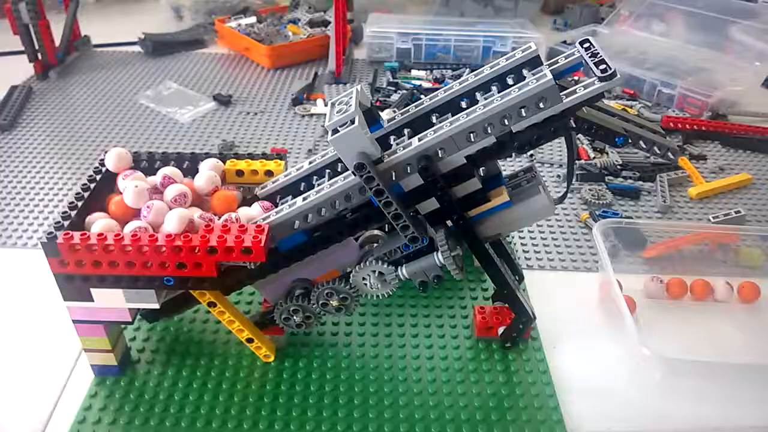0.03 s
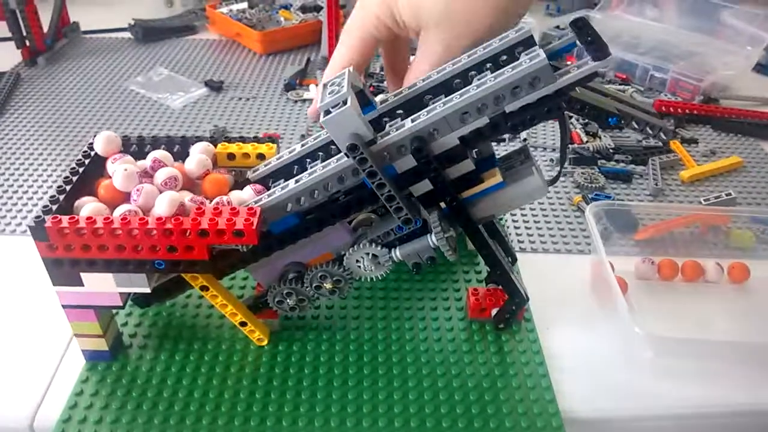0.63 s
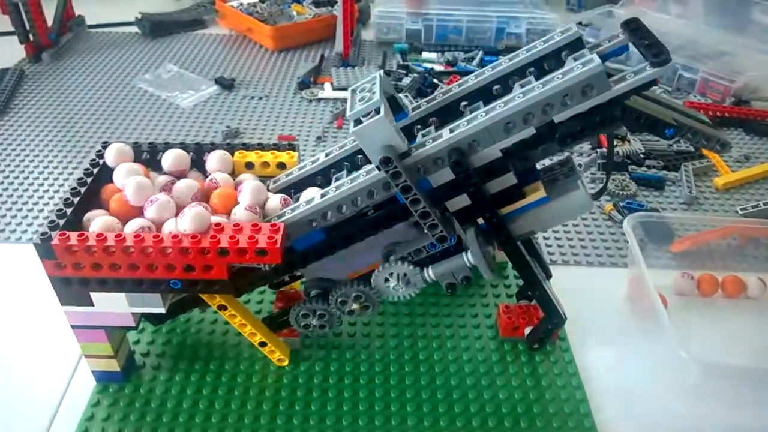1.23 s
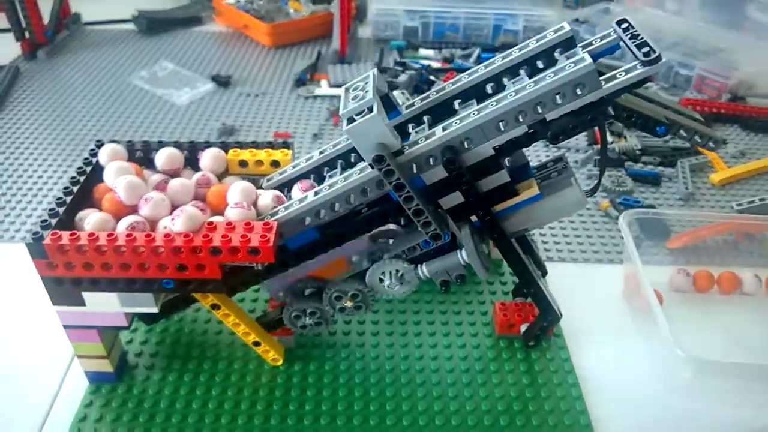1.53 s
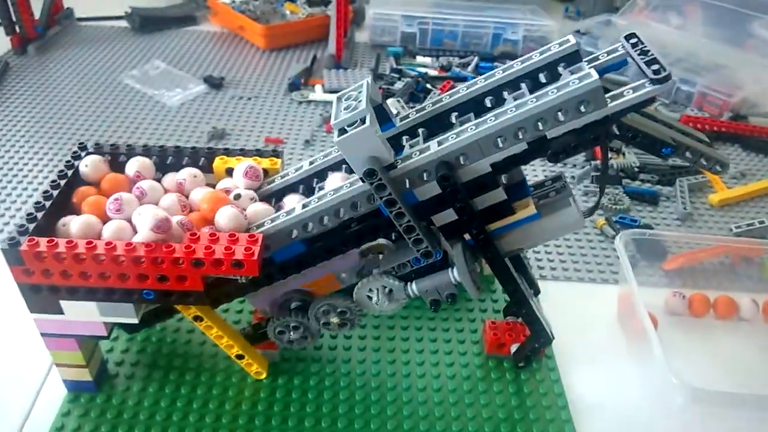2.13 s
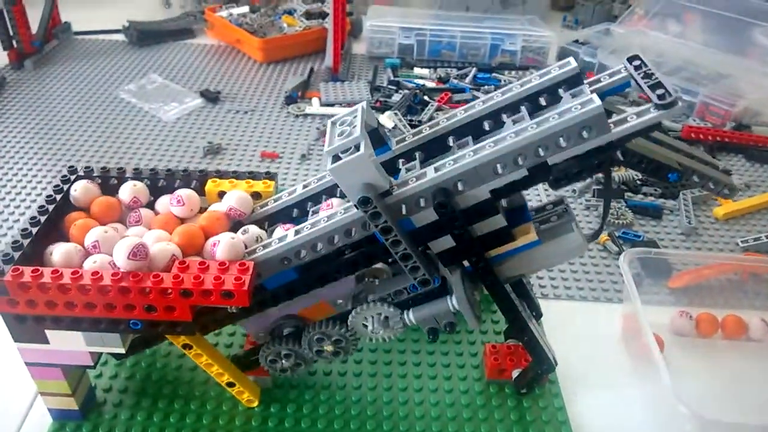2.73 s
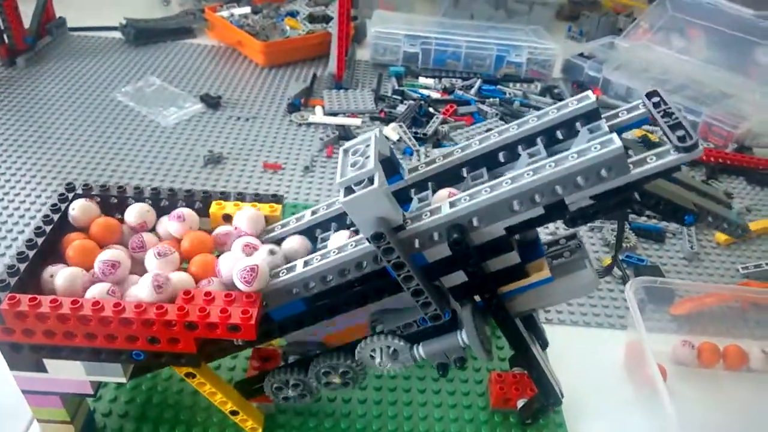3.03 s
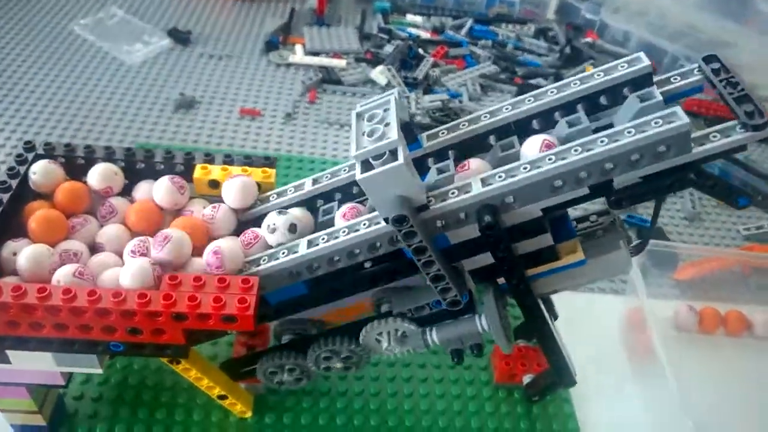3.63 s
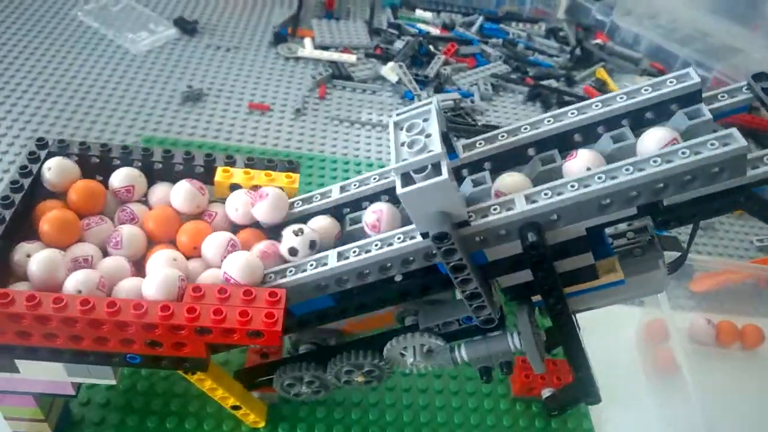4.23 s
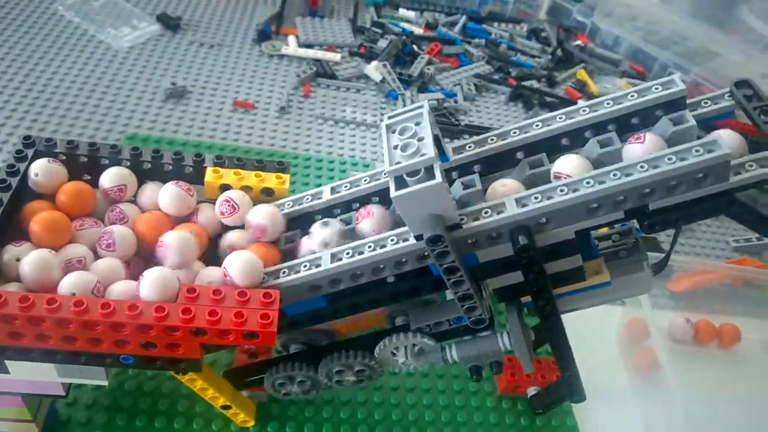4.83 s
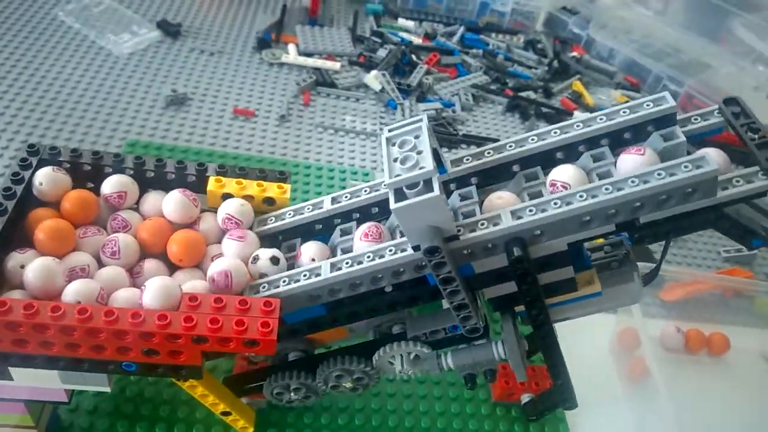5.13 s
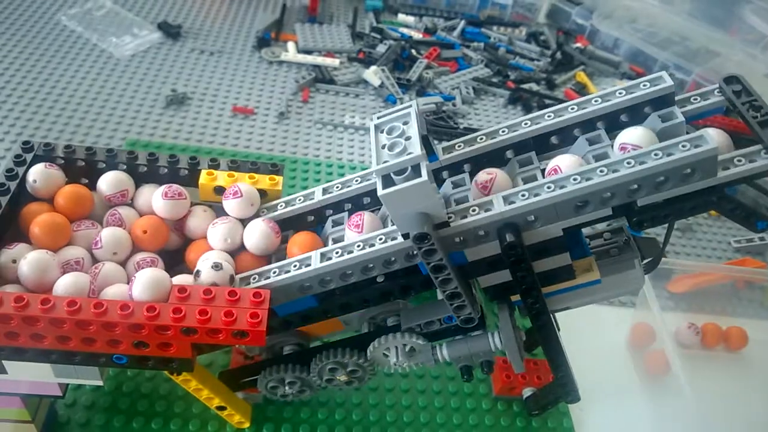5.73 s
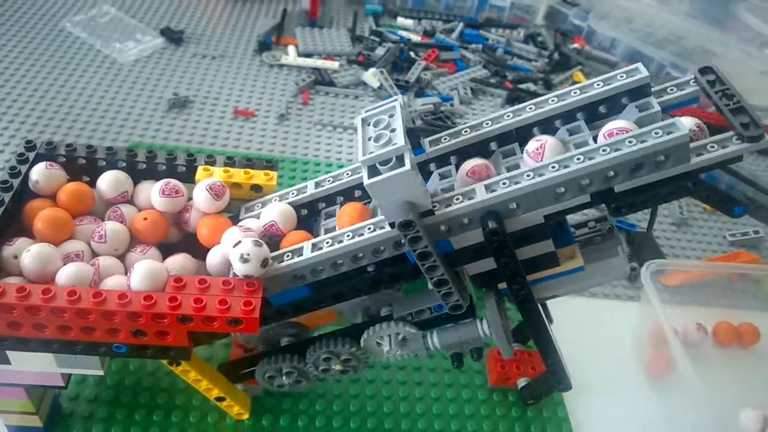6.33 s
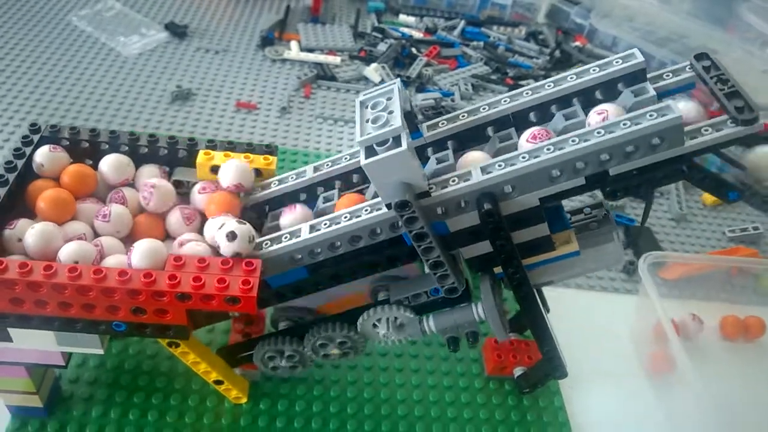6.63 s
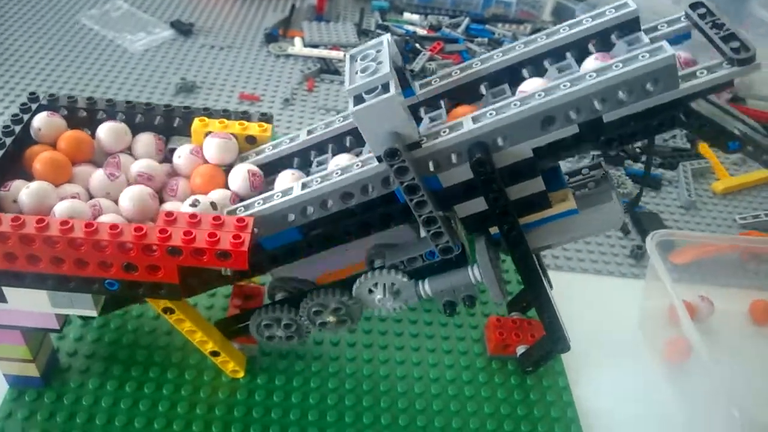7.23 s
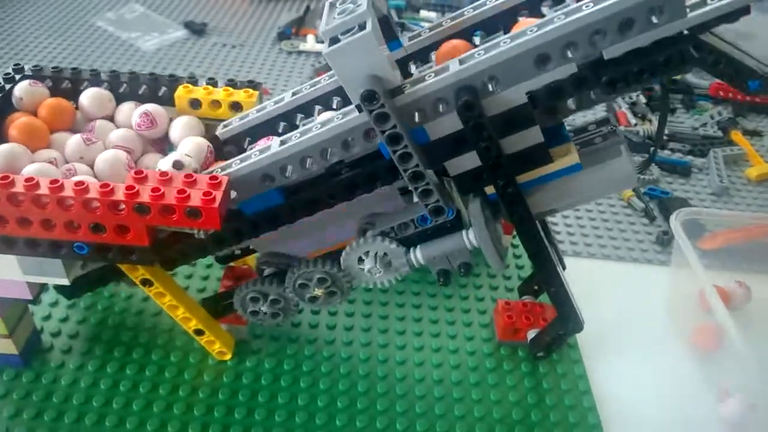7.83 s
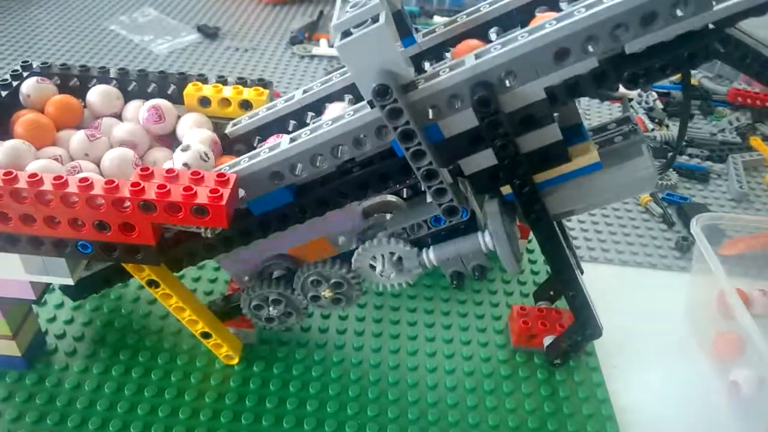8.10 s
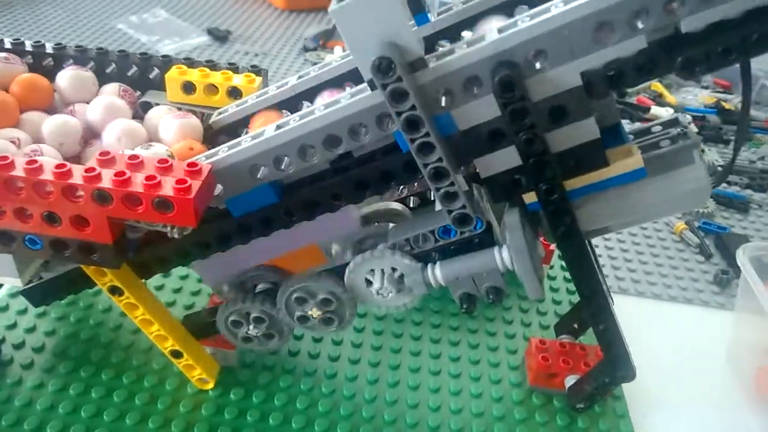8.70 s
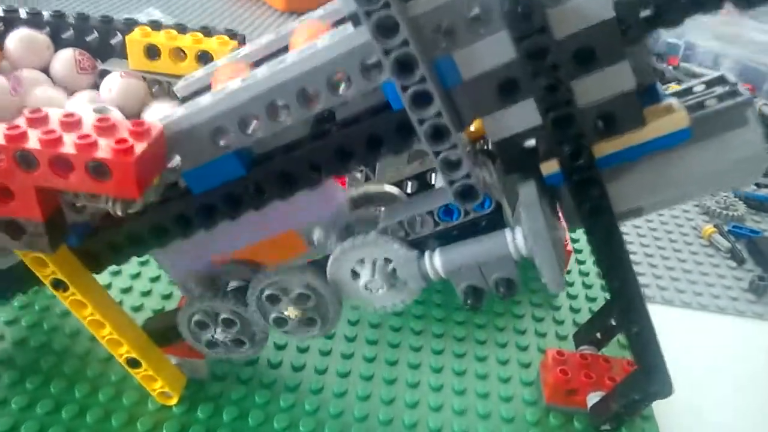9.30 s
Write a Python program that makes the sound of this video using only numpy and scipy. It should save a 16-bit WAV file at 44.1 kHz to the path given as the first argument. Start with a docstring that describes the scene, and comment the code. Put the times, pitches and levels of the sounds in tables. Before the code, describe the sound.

Plastic balls clatter as a toy brick lift whirrs and scrapes in steady strokes, then knock hollowly into a tub.

```python
"""Toy ball lift on a table.

A motorised lift of plastic bricks runs in a quiet room, close to a hand-held camera. Over whirring
gears its steps grind and hiss up and down about every 0.6 s, stirring a hopper of small plastic balls
that click together. Later the balls reach the top and drop into a thin plastic tub;
fingers bump the camera as it moves closer."""
import sys
import numpy as np
from scipy import signal
from scipy.fft import rfft, irfft, next_fast_len
from scipy.io import wavfile
from scipy.ndimage import uniform_filter1d, map_coordinates

SR = 44100
rng = np.random.default_rng(int(sys.argv[2]) if len(sys.argv) > 2 else 0)


def materialize(psi):
    """Save the field psi as 16-bit PCM at rate SR to the path in sys.argv[1].

    A 1-D psi becomes a single channel; in a 2-D psi each row is a channel.
    """
    bounded = np.clip(np.atleast_2d(psi).T, -1, 1)
    quanta = np.round(bounded * 32767).astype(np.int16)
    wavfile.write(sys.argv[1], SR, quanta)


N = 417186
TIME = np.arange(N) / SR
RING = np.arange(SR // 3) / SR  # time axis of one impact, s
IMPULSE = np.where(RING == 0, 1., 0.)
MOTOR_ON_S = 0.87


def undb(db):
    """Decibels to gain."""
    return 10 ** (np.asarray(db) / 20)


def unit(x):
    """Scale to rms 1."""
    return x / np.sqrt(np.mean(x ** 2))


def strike(x):
    """Scale the loudest 5 ms to rms 1."""
    return x / np.sqrt(uniform_filter1d(x ** 2, 220, mode="constant").max())


def since(t_s):
    """Seconds since t_s, 0 before."""
    return np.maximum(TIME - t_s, 0)


def add(out, t_s, x):
    """Mix x into out at t_s."""
    i = int(t_s * SR)
    out[i:i + len(x)] += x[:N - i]


def colour(x, outline, modes=()):
    """Minimum-phase filter: outline (f/Hz, level/dB) plus peaks (f/Hz, width/Hz, gain/dB)."""
    n = 2 * next_fast_len(len(x))
    f = np.maximum(np.arange(n // 2 + 1) * SR / n, 1)
    hz, db = np.transpose(outline)
    db = np.interp(np.log(f), np.log(hz), db)
    for centre_hz, width_hz, gain_db in modes:
        db = db + gain_db / (1 + (2 * (f - centre_hz) / width_hz) ** 2)
    cepstrum = irfft(np.log(undb(db)))
    cepstrum[1:n // 2] *= 2
    cepstrum[n // 2 + 1:] = 0
    return irfft(rfft(x, n) * np.exp(rfft(cepstrum)))[:len(x)]


def fade(t60_s):
    """Exponential decay, -60 dB at t60_s."""
    return np.exp(-np.log(1000) * RING / t60_s)


def burst(t60_s):
    """Dense modes of a small part, as decaying noise."""
    return rng.standard_normal(len(RING)) * fade(t60_s)


def ring(modes, scatter_db, detune):
    """Damped modes (f/Hz, t60/s, level/dB); level and pitch vary with the spot struck."""
    out = 0
    for k, (hz, t60_s, db) in enumerate(modes):
        size, shift = rng.standard_normal(2)
        tone = np.sin(2 * np.pi * hz * (1 + detune * shift) * RING)
        out += (-1) ** k * undb(db + scatter_db * size) * fade(t60_s) * tone
    return out


def walk(rate_hz):
    """Smooth random drift, rms 1."""
    hold = max(int(SR / rate_hz), 2)
    steps = np.repeat(rng.standard_normal(N // hold + 1), hold)
    return unit(uniform_filter1d(steps, hold)[:N])


def wander(x, depth, rate_hz=10):
    """All resonances drift together as the contact point moves."""
    position = np.cumsum(1 + depth * walk(rate_hz))
    return unit(map_coordinates(x, [position], order=3, mode="mirror"))


def contacts(per_s, spread_db, t60_s, parts=10):
    """Tiny random impacts of uneven size on several ringing parts."""
    out = 0
    for _ in range(parts):
        sizes = undb(spread_db * np.minimum(rng.standard_exponential(N), 4))
        hits = (rng.random(N) < per_s / parts / SR) * sizes * rng.choice([-1, 1], N)
        out += signal.oaconvolve(hits, burst(t60_s))[:N]
    return unit(out)


# Wall reflections: f/Hz, level/dB
REVERB_EQ = [(100, 9.5), (300, 4), (900, 4), (2000, 0), (5000, -9), (16000, 3)]


def reverb(x, t60_s, delay_s):
    """Small-room tail after a short gap."""
    tail = burst(t60_s) * np.clip((RING - delay_s) / 0.0055, 0, 1)
    return signal.oaconvolve(x, colour(tail / np.linalg.norm(tail), REVERB_EQ))[:len(x)]


# Room air: f/Hz, level/dB
AIR_EQ = [(25, -8), (50, -3), (170, -7.5), (265, 3), (400, -9.5), (550, -11), (800, -11), (1050, -11),
          (2000, -20), (4000, -22), (7000, -27.5), (11000, -31.5), (16000, -37)]
# Mains and fan hum: f/Hz, drift width/Hz, level/dB
HUM_LINES = [(47.7, 5, -70.5), (100.3, 2.3, -68), (480, 3.8, -76)]


def room_tone(air_db=-65):
    """Faint air noise and wavering hum."""
    out = undb(air_db) * unit(colour(rng.standard_normal(N), AIR_EQ))
    for hz, width_hz, db in HUM_LINES:
        phase = 2 * np.pi * np.cumsum(hz + width_hz / 2 * walk(30)) / SR
        out += undb(db) * unit(np.sin(phase) * undb(2 * walk(10)))
    return out


# Fan swells: t/s, level/dB
FAN_SWELLS = [(.22, -76), (.3, -63), (.39, -77), (.48, -55), (.56, -78), (.67, -72), (.77, -60.5),
              (1.1, -63)]


def fan(hz=288, drift_hz=6):
    """Soft hum that swells and fades, then flutters once the lift runs."""
    tone = np.sin(2 * np.pi * np.cumsum(hz + drift_hz * walk(25)) / SR)
    flutter = 1 + 0.8 * np.minimum(since(MOTOR_ON_S), 1) * walk(14)
    return undb(np.interp(TIME, *np.transpose(FAN_SWELLS))) * unit(tone) * flutter


# Fingers on the camera: t/s, thump/dB, f/Hz, tick/dB
FINGER_BUMPS = [(4.912, -18, 478, -19.5), (8.518, -28.5, 312, -53), (8.669, -21.5, 327, -33),
                (8.706, -29, 326, -47), (8.95, -26, 390, -51), (8.967, -22.5, 350, -37),
                (9.063, -21, 383, -29), (9.089, -18, 386, -36), (9.147, -24.5, 328, -37.5),
                (9.2, -17.5, 360, -30.5), (9.238, -17.5, 365, -28), (9.358, -21.5, 347, -28.5)]


def bumps(rise_s=0.00087, decay_s=0.0022, lead_s=0.02):
    """The case ticks, thumps for a few cycles and shudders."""
    out = np.zeros(N)
    t = RING[RING < 3 * lead_s] - lead_s
    for t_s, db, hz, tick_db in FINGER_BUMPS:
        envelope = 1 / (np.exp(-t / rise_s) + np.exp(t / decay_s))
        thump = envelope / envelope.max() * np.cos(2 * np.pi * hz * t + np.pi / 4)
        tick = colour(burst(0.0059), [(500, -7), (2000, 4.5), (8000, -0.5), (16000, -2.5)])
        shudder = colour(burst(0.071), [(30, -4), (160, 7.5), (400, 3.5), (2000, -82)])
        add(out, t_s - lead_s, undb(db) * thump)
        add(out, t_s - 0.0028, undb(tick_db) * strike(tick))
        add(out, t_s, undb(db - 19) * strike(shudder))
    return out


def jolt(level_db=-42):
    """The frame shakes the table as the motor takes up the load."""
    out = np.zeros(N)
    thud = colour(burst(0.22), [(25, -9), (60, -1), (220, -3), (450, -10), (1500, -15), (8000, -72)])
    add(out, MOTOR_ON_S + 0.0127, undb(level_db) * strike(thud))
    return out


# Axle sizzle: t/s, length/s, level/dB
AXLE_SPELLS = [(4.525, 0.45, -48.5), (8.027, .48, -45.5), (8.63, 0.97, -54)]
# Axle resonances: f/Hz, width/Hz, gain/dB
AXLE_MODES = [(9800, 1600, 16), (14500, 3400, 21)]


def axle(ramp_s=0.032):
    """Flickering friction of a dry axle, ringing in two high bands."""
    friction = rng.standard_normal(N) * undb(4.5 * walk(70))
    sizzle = colour(friction, [(4000, -40), (8000, -10), (12000, -8), (16000, -17)], AXLE_MODES)
    gain = sum(undb(db) * np.clip(np.minimum(TIME - t_s, t_s + length_s - TIME) / ramp_s, 0, 1)
               for t_s, length_s, db in AXLE_SPELLS)
    return gain * unit(sizzle)


# Gear train: f/Hz, level/dB
GEAR_EQ = [(30, -9), (70, 3.5), (140, -11.5), (260, 8), (400, 0.5), (620, -2.5), (950, 3), (1400, 4.5),
           (2500, -5.5), (4400, -13), (8000, -7), (10000, -7.5), (12000, -15), (13500, -27), (16000, -30)]
# Gear resonances: f/Hz, width/Hz, gain/dB
GEAR_PEAKS = [(754, 29, 8.5), (940, 27, 5), (1250, 48, 4), (1550, 60, 8.5), (3440, 450, 5),
              (5170, 370, 12.5), (6630, 2200, 11.5)]


def gears(effort_db, load_share=0.11):
    """Whirr of tooth contacts, louder under load and as the camera closes in."""
    whirr = unit(colour(contacts(per_s=4000, spread_db=3.5, t60_s=0.034), GEAR_EQ, GEAR_PEAKS))
    nearness_db = np.interp(TIME, [3, 6.5, 9], [-52, -50.5, -45])
    load_db = load_share * (effort_db - np.median(effort_db))
    return whirr * undb(nearness_db + load_db + 2.7 * walk(25))


# Pushing step: f/Hz, level/dB
PUSH_EQ = [(1500, -12), (2800, -8.5), (4500, -9.5), (7000, -6), (9000, -10), (12000, -2), (14500, -7.5),
           (16000, -13)]
# Its resonances: f/Hz, width/Hz, gain/dB
PUSH_MODES = [(2900, 190, 11.5), (3670, 200, 14.5)]
# Step sliding back: f/Hz, level/dB
RETURN_EQ = [(700, -16), (1400, -4), (2100, -4), (2800, -3), (4000, -28), (5900, -21), (7400, -4),
             (8300, -13), (9700, -4), (12000, -12), (14300, -9), (16000, -16)]


def step_hiss(push_gain, return_gain):
    """Sliding faces hiss, singing only under load."""
    friction = rng.standard_normal(N) * undb(3.3 * walk(64) + 2.3 * walk(13))
    singing = wander(colour(friction, PUSH_EQ, PUSH_MODES), depth=0.022)
    return push_gain * singing + return_gain * unit(colour(friction, RETURN_EQ))


def clack(centre_hz, t60_s, spread_oct=0.274):
    """One struck brick: six short modes around its pitch."""
    pitches_hz = centre_hz * 2 ** (spread_oct * rng.uniform(-0.988, 1, size=6))
    return strike(ring([(hz, t60_s, 0) for hz in pitches_hz], scatter_db=2.5, detune=0))


def rattle(range_db, count, centre_hz=3100, spread_oct=0.85):
    """Loose bricks and balls clack at random, each at its own pitch."""
    out = np.zeros(N)
    bricks = [clack(centre_hz * 2 ** (spread_oct * rng.uniform(-1, 1)), t60_s=0.035)[:SR // 10]
              for _ in range(40)]
    for when, which, size in rng.random((count, 3)):
        add(out, when * TIME[-1], undb(range_db * size) * bricks[int(which * len(bricks))])
    return unit(out)


# Brick frame: f/Hz, level/dB
FRAME_EQ = [(60, -45), (150, -19), (400, -20.5), (540, -5), (680, -9.5), (1000, -4.5), (1500, 1),
            (2100, -1.5), (2900, -1.5), (4800, -4), (7000, -9.5), (10000, -13.5), (13000, -24.5),
            (16000, -72)]
# Frame resonances: f/Hz, width/Hz, gain/dB
FRAME_PEAKS = [(544, 35, 3.5), (762, 150, 4), (940, 46, 11.5), (1175, 286, 6), (1410, 150, 4),
               (3590, 120, 2.5), (5100, 330, 4)]
# Ball on ball: f/Hz, level/dB
TICK_EQ = [(400, -16), (1500, -3), (3300, 2.5), (5500, -0.5), (9000, -3), (16000, -29)]


def scrape(effort_db):
    """Steps catch and slip, grinding through the frame; jostled balls rattle and tick."""
    judder_db = 2.16 * walk(110) + 2 * walk(28)
    grit = contacts(per_s=1900, spread_db=3, t60_s=0.012)
    grind = wander(colour(grit, FRAME_EQ, FRAME_PEAKS), depth=0.007)
    ticks = unit(colour(contacts(per_s=51, spread_db=4, t60_s=0.0075), TICK_EQ))
    mix = undb(-5.5) * grind + undb(-11) * rattle(range_db=11, count=800) + undb(-16) * ticks
    return mix * undb(effort_db + judder_db)


# Pile giving way: t/s, length/s, level/dB, f/Hz
PILE_SLIPS = [(1.02, 0.047, -36.5, 2940), (1.11, 0.044, -39, 2800), (1.231, 0.03, -37.5, 2800),
              (1.659, 0.046, -41.5, 2400), (1.744, 0.067, -37, 2400), (1.831, 0.019, -35.5, 3400),
              (2.274, .12, -38, 2750), (2.455, 0.046, -32.5, 2800), (2.817, 0.042, -41.5, 3700),
              (2.938, 0.11, -36, 2700), (3.106, 0.035, -36.5, 3700), (3.539, 0.066, -32.5, 2810),
              (3.655, 0.064, -38, 2850), (4.129, 0.045, -33.5, 2900), (4.294, 0.033, -34.5, 2800),
              (4.569, 0.072, -36.5, 4730), (4.711, 0.07, -34, 1600), (4.819, 0.013, -35.5, 2800),
              (4.939, 0.041, -35.5, 1490), (5.471, 0.047, -35, 3500), (6.049, 0.015, -34.5, 3520),
              (6.631, 0.085, -37, 3500), (7.237, 0.021, -32, 3700), (7.674, 0.08, -37, 2900),
              (7.826, 0.033, -32.5, 2980), (8.262, 0.048, -34, 4800), (8.393, 0.066, -31, 1630),
              (9.003, 0.049, -29.5, 4200)]


def clumps(width_hz=380, peak_db=7, attack_s=0.0033, release_db_per_s=520):
    """A bunch of balls breaks loose and chatters along the step at its own pitch."""
    out = np.zeros(N)
    chatter = contacts(per_s=700, spread_db=2, t60_s=0.012) * undb(1.7 * walk(120))
    clacks = undb(-6) * rattle(range_db=8, count=1600)
    for t_s, length_s, db, hz in PILE_SLIPS:
        attack = np.minimum(RING / attack_s, 1)
        release = undb(-release_db_per_s * np.maximum(RING - length_s, 0))
        span = slice(int(t_s * SR), int(t_s * SR) + len(RING))
        grind = unit(colour(chatter[span], FRAME_EQ, FRAME_PEAKS + [(hz, width_hz, peak_db)]))
        add(out, t_s, undb(db) * attack * release * unit(grind + clacks[span]))
    return out


# Contact crack: f/Hz, level/dB
CRACK_EQ = [(1500, 9.5), (3500, -17), (5800, 11), (8500, 17), (12000, 11), (16000, -5)]
# Balls hitting balls and steps: t/s, level/dB, treble trim/dB, f/Hz
BALL_CLICKS = [(0.87, -18.5, -27, 3050), (1.048, -18.5, -18, 1500), (1.1214, -22, -21, 5100),
               (1.196, -23, -16, 4500), (1.25, -22.5, -6, 5100), (1.2669, -17.5, -20, 2830),
               (1.3436, -22, -16, 1320), (1.37, -21, -20, 3200), (1.866, -17.5, -7, 4570),
               (1.8854, -16, -16, 2820), (2.0188, -25.5, -31, 3450), (2.2681, -23, -30, 3700),
               (2.475, -21, -10, 2800), (2.61, -27.5, -27, 5100), (3.0306, -20, -13, 6000),
               (3.079, -26, -20, 4500), (3.108, -23, -9, 3080), (3.129, -17.5, -2.5, 4700),
               (3.266, -23.5, -29, 3090), (3.277, -25.5, -26, 1010), (3.5885, -17, -11, 4480),
               (3.682, -19, -20, 4700), (3.912, -24.5, -23, 5100), (4.135, -20.5, -14, 2900),
               (4.2112, -17.5, -9, 4000), (4.224, -15.5, -5, 5500), (4.3212, -20, -3.5, 5100),
               (4.3775, -23.5, -13, 4400), (4.577, -17.5, -10, 1400), (4.784, -16.5, -7, 5600),
               (4.880, -21, -6, 2800), (4.8927, -11.5, -10, 2900), (4.988, -18.5, -12, 4120),
               (5.023, -17.5, -15, 5200), (5.1242, -21, -3, 4970), (5.2098, -22, -20, 3620),
               (5.419, -17.5, -8, 3400), (5.464, -15.5, -14, 4000), (5.4921, -11.5, -9, 5100),
               (5.576, -18, -16, 4840), (5.78, -24.5, -24, 3200), (6.0702, -19, -5.5, 3100),
               (6.1, -19.5, -14, 2900), (6.4607, -16.5, -8, 4740), (6.7486, -17.5, -23, 3020),
               (6.788, -23, -4, 5060), (6.8333, -17, -17, 3880), (6.968, -20.5, -23, 3540),
               (7.281, -24, 7, 6500), (7.556, -22, -22, 3600), (7.641, -18.5, -9, 4230),
               (7.7507, -13.5, -15, 3870), (7.8333, -16, -5.5, 3700), (8.229, -13.5, -3, 3850),
               (8.9589, -19.5, 1, 4500), (9.0576, -17.5, 0, 2000), (9.314, -14.5, -22, 3700)]


def clicks():
    """Hard balls snap; the struck part rings briefly and stirs the frame."""
    out = np.zeros(N)
    snap = strike(colour(IMPULSE, TICK_EQ))
    for t_s, db, treble_db, hz in BALL_CLICKS:
        frame = strike(colour(burst(0.028) + undb(-8.5) * burst(0.14), FRAME_EQ, FRAME_PEAKS))
        crack = strike(colour(burst(0.017), CRACK_EQ))
        ringing = undb(-17) * frame + undb(-16.5) * clack(hz, t60_s=0.028)
        add(out, t_s, undb(db) * (undb(-21) * snap + ringing + undb(treble_db - 13.5) * crack))
    return out


# Tub floor modes: f/Hz, t60/s, level/dB
FLOOR_MODES = [(242.5, 0.063, 5.5), (289, 0.055, 6), (360, 0.081, -2.5), (508, 0.11, -13)]


def tub_boom(swell_s=0.0028):
    """The tub floor booms: low modes plus a dull thud."""
    modes = ring(FLOOR_MODES, scatter_db=2, detune=0.022)
    thud_eq = [(90, -25.5), (170, -12), (245, -2.5), (350, -8), (600, -11.5), (2000, -76)]
    thud = strike(colour(burst(0.053), thud_eq))
    return strike(modes + undb(7.5) * thud) * np.minimum(RING / swell_s, 1)


# Tub wall: f/Hz, level/dB
WALL_EQ = [(70, -42), (170, -35.5), (450, -14.5), (620, -6.5), (780, -2), (1100, -5.5), (1550, -2),
           (2200, -8), (3600, -11.5), (5000, -14), (9000, -41), (16000, -23)]
# Wall resonances: f/Hz, width/Hz, gain/dB
WALL_MODES = [(800, 120, 6.5), (967, 81, 5.5), (1223, 110, 4.5), (1400, 200, 3), (2500, 470, 3),
              (3540, 570, 5.5)]
# Landings: t/s, knock/dB, boom/dB, crack/dB, hollowness (0 on balls, 1 on bare tub), f/Hz
TUB_DROPS = [(5.692, -11, -33, -32, 0.79, 1610), (5.884, -23.5, -44.5, -35, 0.96, 1200),
             (5.891, -16.5, -40.5, -33.5, 0.99, 1300), (6.290, -11, -33, -32, 0.79, 1660),
             (6.4919, -9.5, -47, -37, 0.42, 2040), (6.535, -22.5, -41.5, -50, 0.66, 2000),
             (6.558, -21, -47, -39, 0.74, 1410), (6.581, -18.5, -45, -40, 0.8, 800),
             (6.867, -12, -32.5, -28, 0.9, 1550), (7.060, -18, -45, -31.5, 0.79, 1700),
             (7.063, -7, -30.5, -29.5, 0.54, 950), (7.120, -11, -44, -35, 0.29, 2000),
             (7.262, -19.5, -40.5, -35, 0.8, 940), (7.292, -11, -50, -31, 0.33, 1900),
             (7.340, -23.5, -49.5, -43, 0.92, 1400), (7.430, -23, -47.5, -42, 0.9, 1370),
             (8.043, -7.5, -34, -27, 0.7, 1540), (8.246, -7, -36, -22, 0.49, 3420),
             (8.2481, -11, -46, -29.5, 0.33, 3400), (8.274, -26, -40, -42, 0.46, 1600),
             (8.3428, -9, -42, -33, 0.39, 1880), (8.629, -5.5, -33, -25.5, 0.56, 2230),
             (8.831, -15, -35.5, -31.5, 1, 1410), (8.850, -12, -50, -33, 0.64, 2080),
             (8.896, -15.5, -49, -36, 0.56, 1850), (9.262, -7, -30.5, -25, 0.51, 1470)]


def drops(clack_width_ratio=0.49, clack_peak_db=9):
    """Balls land in the tub; the barer the spot, the more wall clatter and room answer."""
    out = np.zeros(N)
    for t_s, knock_db, boom_db, crack_db, hollow, clack_hz in TUB_DROPS:
        spot_modes = [(hz * (1 + 0.025 * rng.standard_normal()), width_hz,
                       db + 1.5 * rng.standard_normal()) for hz, width_hz, db in WALL_MODES]
        clack_mode = (clack_hz, clack_width_ratio * clack_hz, clack_peak_db)
        snap = strike(colour(IMPULSE, WALL_EQ, spot_modes + [clack_mode]))
        wall = strike(colour(burst(0.0027) + undb(-3.5) * burst(0.043), WALL_EQ, spot_modes))
        knock = undb(knock_db) * (undb(-3.5 - 8 * hollow) * snap + hollow * undb(-7) * wall)
        boom = undb(boom_db + 7) * tub_boom()
        crack = undb(crack_db + 2) * strike(colour(burst(0.0048) + undb(-12.5) * burst(0.025), CRACK_EQ))
        # The room hears all sides of the tub, so single pitches even out.
        diffuse = snap * np.linalg.norm(knock) / np.linalg.norm(snap)
        room = undb(-4.5) * np.sqrt(hollow) * reverb(diffuse + boom + crack, t60_s=0.22, delay_s=0.0089)
        add(out, t_s + 0.00099, knock + boom + crack + room)
    return out


def shaking(settle_db_per_s=263):
    """Gain of the pile's brief rattle after each click and drop."""
    gain = np.zeros(N)
    for events, offset_db in (BALL_CLICKS, -17.5), (TUB_DROPS, -27):
        for t_s, db, *_ in events:
            add(gain, t_s, undb(db + offset_db - settle_db_per_s * RING))
    return gain


# Step wedged in the pile: t/s, length/s, depth/dB
STEP_STALLS = [(1.29, .045, -4), (2.385, 0.057, -5), (2.87, 0.025, 0), (4.226, 0.047, -5),
               (4.84, 0.033, -17), (4.995, .03, -10), (6.005, 0.058, -5.5), (6.768, .066, -5),
               (7.32, 0.13, -7)]


def stalling(ramp_s=0.0094):
    """Gain that sinks as a step wedges and returns as it slips free."""
    db = np.zeros(N)
    for t_s, length_s, depth_db in STEP_STALLS:
        add(db, t_s, depth_db * np.minimum(RING[RING < length_s] / ramp_s, 1))
    return undb(db)


# Step strokes: t/s, push length/s, grind/dB, push hiss/dB, return hiss/dB
STEP_STROKES = [(0.878, 0.33, -35, -48, -60), (1.50, 0.31, -35.5, -46, -85),
                (2.11, 0.36, -35.5, -45.5, -68), (2.78, 0.308, -35, -43, -77),
                (3.32, 0.43, -35.5, -45.5, -56), (3.92, 0.42, -34.5, -44.5, -46.5),
                (4.55, 0.4, -34.5, -47, -64), (5.13, 0.34, -33, -45, -85), (5.67, 0.43, -35, -46, -77),
                (6.28, 0.42, -32.5, -44, -71), (6.87, 0.533, -35.5, -44, -72),
                (7.46, 0.44, -39, -45.5, -48.5), (8.02, 0.5, -37, -43, -51), (8.63, 0.45, -32.5, -42, -69),
                (9.19, .42, -32, -41.5, -61)]


def strokes(lead_s=0.062, release_db_per_s=253, dig_s=0.17, dig_db=18.5,
            speed_up_s=0.12, speed_up_db=11.5, slow_after_s=0.19, slow_db_per_s=47,
            return_after_s=0.28, return_half_width_s=0.21):
    """Grind, push and return gains: a step speeds up, digs in, slows, lets go and slides back."""
    load, push, back = 0, 0, 0
    for t_s, length_s, grind_db, push_db, return_db in STEP_STROKES:
        top_s = t_s + length_s
        moving = np.clip((TIME - t_s) / lead_s + 1, 0, 1) * undb(-release_db_per_s * since(top_s))
        digging_db = dig_db * np.minimum(since(t_s) / dig_s - 1, 0)
        speed_db = speed_up_db * np.minimum(since(t_s) / speed_up_s - 1, 0)
        speed_db -= slow_db_per_s * since(t_s + slow_after_s)
        returning = 1 / (1 + ((TIME - top_s - return_after_s) / return_half_width_s) ** 4)
        load += moving * undb(grind_db + digging_db)
        push += moving * undb(push_db + speed_db)
        back += returning * undb(return_db)
    return load, push, back


def lift(floor_db=-75, start_ramp_s=0.013):
    """Strokes drive scrape, hiss and gear load; the gears whirr on in between."""
    running = np.minimum(since(MOTOR_ON_S) / start_ramp_s, 1)
    load, push, back = strokes()
    stall = stalling()
    effort_db = 10 * np.log10((load * stall) ** 2 + shaking() ** 2 + undb(floor_db) ** 2)
    return running * (scrape(effort_db) + step_hiss(push * stall, back) + gears(effort_db))


def scene():
    """Mono mix: lift close and fairly dry, tub a little further off."""
    machine = lift() + clumps() + axle() + clicks() + jolt()
    walls = undb(-9.5) * reverb(machine, t60_s=0.21, delay_s=0.016)
    return (machine + walls + drops() + bumps() + room_tone() + fan())[None]


def record(dry, ceiling=0.49, cutoff_hz=15900):
    """Fade-in, soft clip, low-pass."""
    fade_in = undb(np.interp(TIME, [0.08, 0.15, 0.25], [-45, -16, 0]))
    rounded = ceiling * np.tanh(dry * fade_in / ceiling)
    return signal.sosfilt(signal.ellip(10, 0.2, 70, cutoff_hz, fs=SR, output="sos"), rounded)


dry = scene()
out = record(dry)
materialize(out)
```